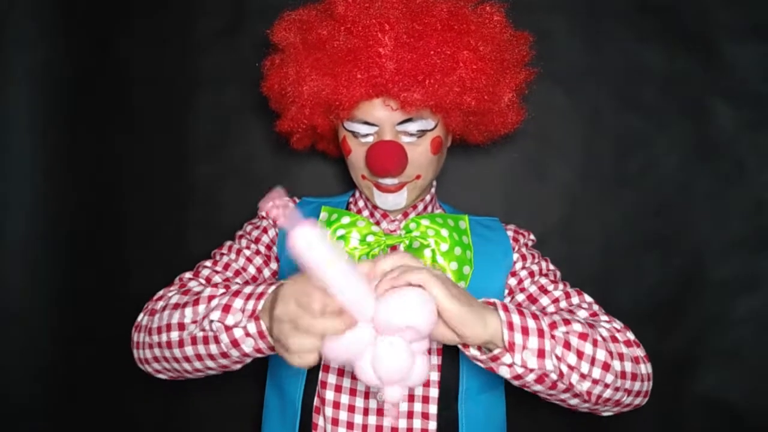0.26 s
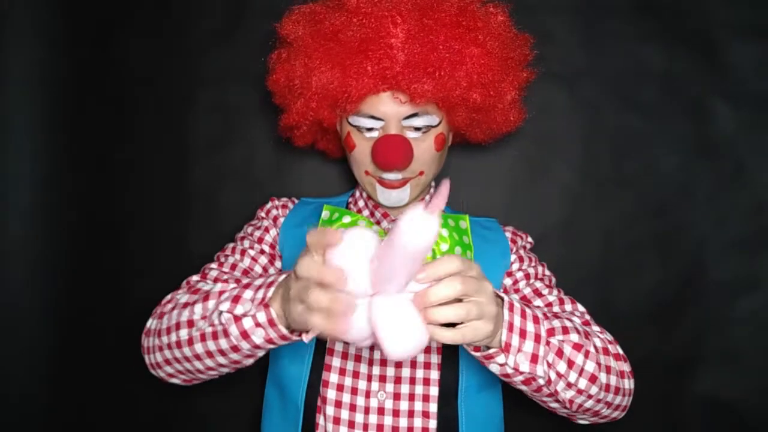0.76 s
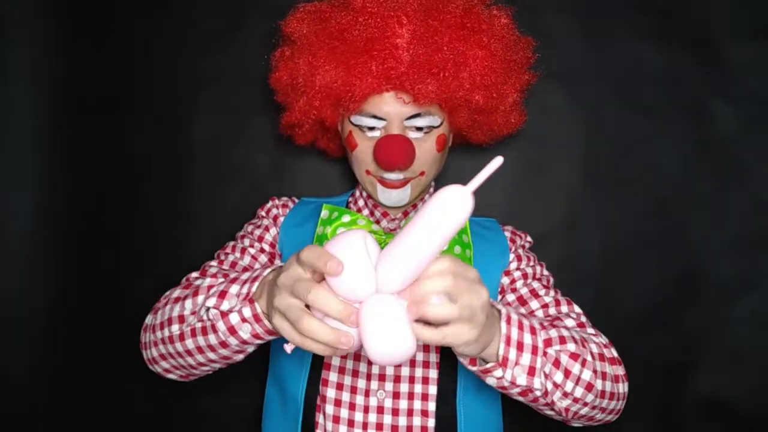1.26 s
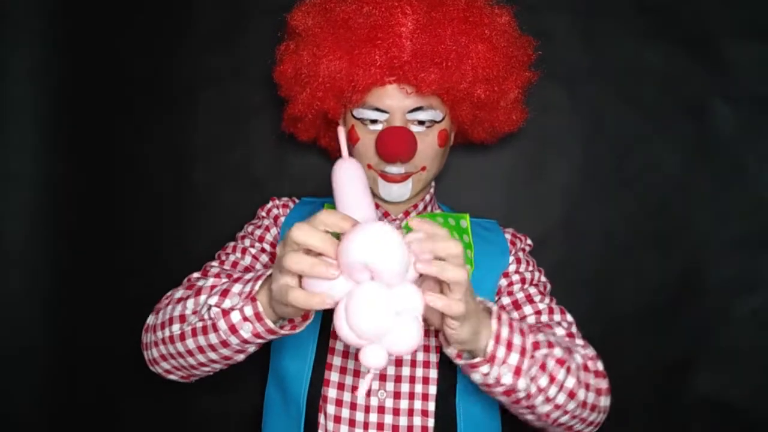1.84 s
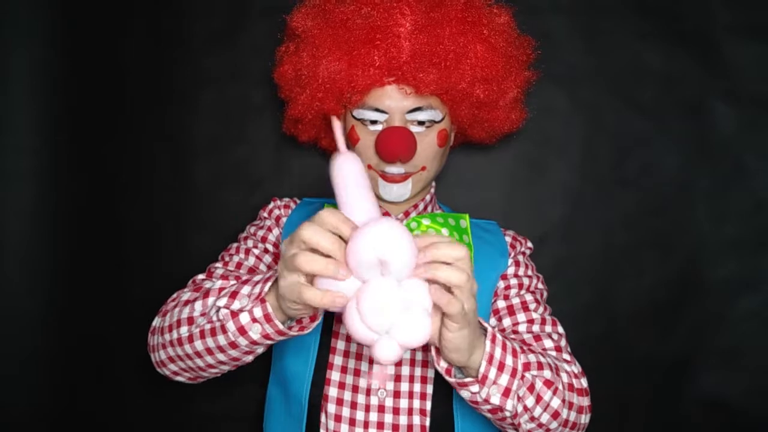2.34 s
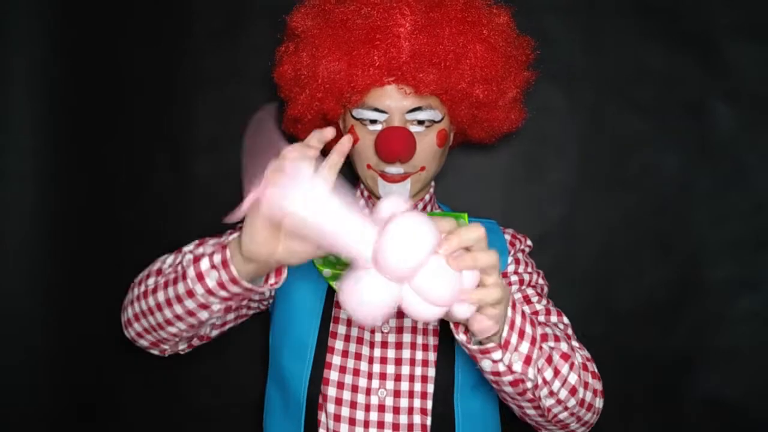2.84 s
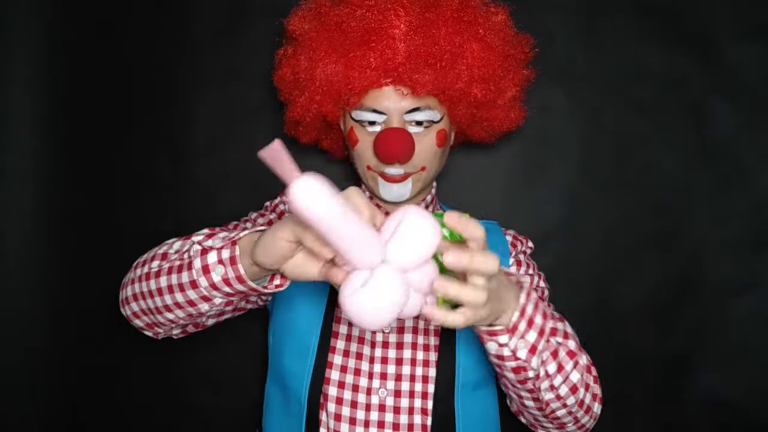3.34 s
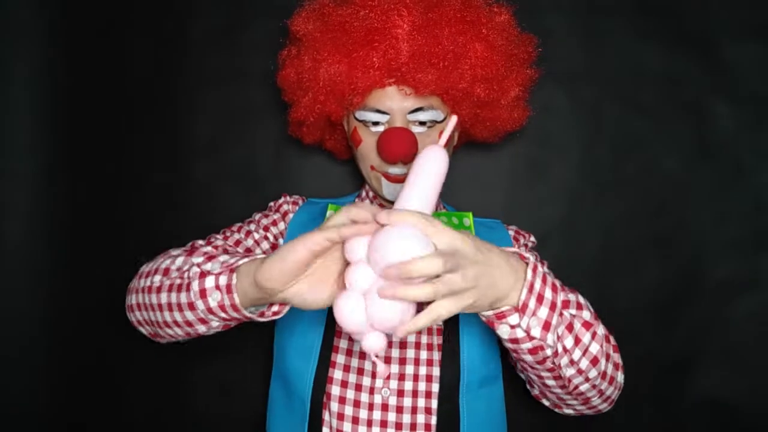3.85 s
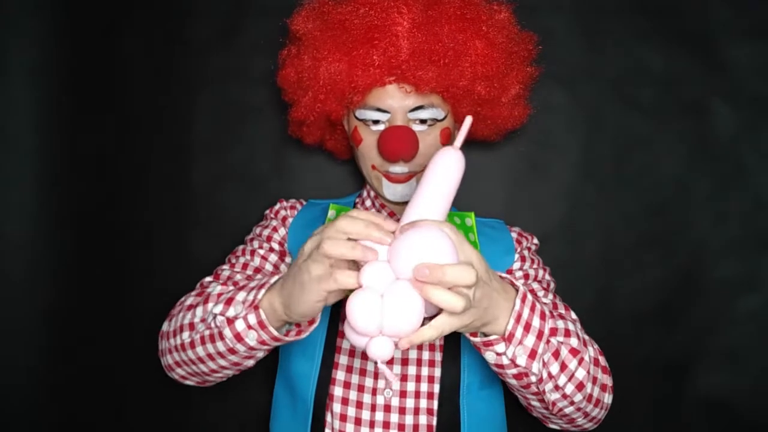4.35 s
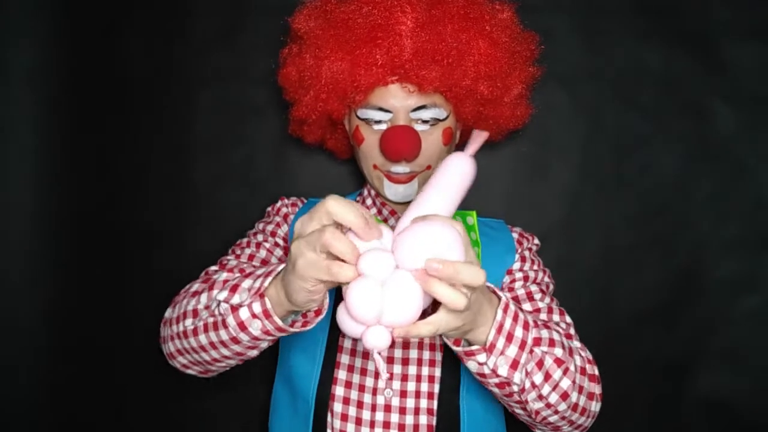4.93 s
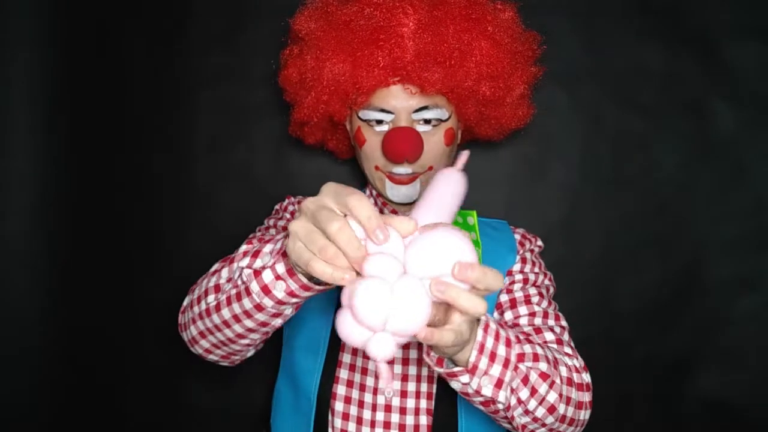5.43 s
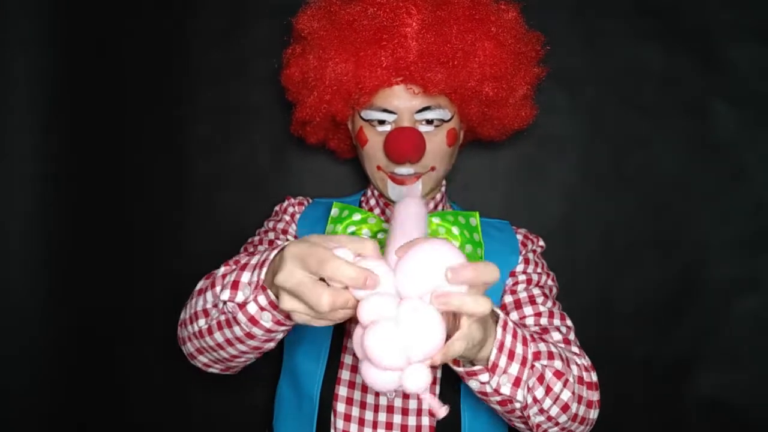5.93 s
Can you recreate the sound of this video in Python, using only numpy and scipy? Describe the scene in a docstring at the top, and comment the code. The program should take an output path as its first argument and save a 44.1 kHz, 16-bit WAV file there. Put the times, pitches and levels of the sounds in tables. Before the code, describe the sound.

Hands twist and squeeze a long latex balloon close to the microphone, in a small room with a faint steady hush. A loud cluster of rubbery creaks and sharp snaps opens the first 0.3 seconds, mixed with the hiss of sliding fingers. Softer rubbing and light knocks follow, then short creaks and snaps return from about 1 to 1.6 seconds and again at 2. After quieter rubbing, a few hollow thumps on the balloon stand out around 3 seconds, the air inside ringing briefly. Short creaks and crackling slides continue in irregular runs. From about 4.3 seconds the twisting gets busier, with quick high creaks and two hard snaps near 5.35. The loudest creak and snap come at 6 seconds, briefly overloading the microphone, and trail off in a short rub.

```python
"""A small room, close up: hands twist and squeeze a long latex balloon over a faint, steady hush.
Latex sticks on latex and lets go in sharp snaps that run together into creaks. Sliding fingers hiss
and crackle, knocks thump the balloon's bubbles, and the air inside rings on after each push.
The hardest snaps overload the microphone input."""
import sys
import numpy as np
from scipy import signal
from scipy.fft import rfft, irfft
from scipy.io import wavfile
from scipy.ndimage import uniform_filter1d

SR = 44100
rng = np.random.default_rng(int(sys.argv[2]) if len(sys.argv) > 2 else 0)


def store_wav(level_fs):
    """Save 16-bit WAV to argv[1]."""
    pcm = np.round(np.clip(np.atleast_2d(level_fs), -1, 1) * 32767)
    wavfile.write(sys.argv[1], SR, pcm.T.astype(np.int16))


N = 272957

# ringing modes of the air in the bubbles: (pitch [Hz], decay to -60 dB [s], level [dB])
AIR_MODES = [(142, 0.11, -5), (520, 0.28, -10), (757, 0.025, -5)]
# tone of a finger hissing along the latex: (frequency [Hz], level [dB])
HISS_EQ = [(150, -22.5), (1500, -27.5), (4800, -6), (5200, 6.5), (6800, 2), (8500, -11), (10500, -28.5),
           (16000, -45.5)]
# tone of a grip breaking up into crackle: (frequency [Hz], level [dB])
CRACKLE_EQ = [(60, -20.5), (500, -8), (1500, 2.5), (3500, 7), (6000, 2.5), (8500, -21), (11000, -38),
              (16000, -38.5)]
# tone of a push on a bubble: (frequency [Hz], level [dB])
PUSH_EQ = [(300, 2), (850, -4), (2000, -4.5), (5000, -17.5), (10000, -46.5)]
# tone of the taut skin when flicked: (frequency [Hz], level [dB])
SKIN_EQ = [(200, -53), (1000, -23.5), (2000, -3), (3000, 0.5), (5500, 3.5), (7000, -4), (8500, -14),
           (10500, -34.5), (16000, -54.5)]
# a finger slides along the latex: (start [s], length [s], hiss level [dB], crackle against hiss [dB])
FINGER_SLIDES = [(0.018, 0.23, -29, 0), (0.137, 0.26, -26.5, -12), (0.475, .32, -43, -7.5),
                 (0.88, 0.14, -50, -4), (0.98, 0.16, -39, -5), (1.217, 0.28, -41.5, -24),
                 (1.523, 0.049, -35.5, -5), (1.782, 0.056, -35.5, -9), (1.912, 0.3, -41.5, 0),
                 (2.251, 0.039, -42.5, 4.5), (2.4, 0.23, -35.5, -10), (2.644, 0.089, -33, -4),
                 (2.737, 0.24, -34, -13), (3.066, 0.28, -33, -7), (3.343, 0.11, -42, -25),
                 (3.59, 0.19, -34.5, -14), (3.71, 0.27, -38, -9.5), (3.91, .17, -33.5, -5.5),
                 (4.118, .1, -51, 4.5), (4.233, 0.28, -35.5, 3.5), (4.57, 0.27, -53, 11.5),
                 (4.7, 0.3, -37, 0), (5.109, 0.37, -34, 0), (5.478, 0.29, -33, -3), (5.785, 0.1, -40.5, -9),
                 (5.91, 0.098, -30, -4), (6.0, 0.27, -33.5, -10)]
# fingers knock on or brush a bubble: (time [s], level [dB], pitch [Hz])
FINGER_KNOCKS = [(0.399, -46.5, 328), (0.467, -37, 327), (0.576, -41.5, 226), (0.63, -35.5, 396),
                 (0.686, -35, 245), (0.895, -41, 270), (0.941, -27, 204), (1.715, -24.5, 315),
                 (1.734, -25.5, 303), (2.012, -23, 268), (2.58, -39, 243), (2.755, -40.5, 129),
                 (2.82, -42, 169), (2.919, -12.5, 295), (2.934, -12, 302), (2.949, -20.5, 212),
                 (3.072, -24, 282), (3.083, -17.5, 232), (3.371, -43, 304), (3.425, -42, 198),
                 (3.618, -35.5, 225), (3.834, -49, 166), (5.538, -34, 420), (5.7, -33.5, 452)]
# a twist creaks in a run of slips, and the grip tunes the stretched latex:
# (start [s], slips [count], slip rate [1/s], level [dB], skin pitch [Hz], boost at that pitch [dB],
#  bubble pitch [Hz], push on the bubble against the skin's flick [dB])
TWIST_CREAKS = [(0.0075, 4, 53, -17, 4440, 8, 395, -17.5), (0.0808, 3, 62, -14, 3720, 9, 1660, -15.5),
                (0.1496, 6, 123, -12, 2840, 2.5, 516, -9.5), (0.2606, 2, 60, -14.5, 4800, 4.5, 463, -12.5),
                (0.5696, 6, 65.5, -31, 4500, -8, 360, -15), (0.9898, 6, 56, -19, 5500, 0, 390, -15),
                (1.2146, 3, 76, -16.5, 3700, 6, 470, -15.5), (1.2925, 2, 60, -18.5, 3700, -3.5, 467, -12),
                (1.4453, 2, 77, -28, 3760, 13, 655, -26), (1.5865, 1, 86, -13, 6540, 11, 686, -16),
                (1.7829, 2, 157, -26.5, 2600, 10, 700, -8), (1.969, 2, 54.4, -12.5, 4850, 8, 903, -6.5),
                (2.272, 2, 49, -24, 2900, 5, 387, -22.5), (2.4087, 5, 41.4, -27.5, 3050, 2, 387, -27),
                (2.774, 4, 67, -26, 4970, -3, 370, -14.5), (2.9181, 2, 61, -20, 6950, -8, 260, -11.5),
                (3.1721, 3, 55, -19, 4480, 10.5, 2090, -24), (3.234, 3, 66, -28, 6040, 8, 1710, -20),
                (3.319, 2, 90, -25.5, 6350, 5, 1560, -10.5), (3.5783, 2, 71, -22.5, 2890, -2, 342, -22),
                (3.6618, 2, 68, -22, 2970, 7.5, 342, -21.5), (3.7359, 3, 78, -17, 3800, 6, 644, -14.5),
                (3.908, 2, 57, -34.5, 2970, 2, 1390, -5.5), (4.013, 2, 88, -30, 6000, 9, 1500, -4.5),
                (4.089, 1, 60, -32, 2700, 0, 520, 1.5), (4.2825, 7, 39, -16, 3850, 7, 402, -5),
                (4.7051, 3, 168, -13, 6060, 2.5, 1290, -13.5), (4.8119, 7, 143, -20.5, 4000, 2, 634, -12),
                (4.9091, 5, 49, -22, 6030, 13.5, 473, -20.5), (5.0429, 2, 88, -12.5, 6500, 2.5, 478, -12),
                (5.1262, 2, 64, -14, 5470, 3.5, 819, 0.5), (5.2262, 4, 102, -18, 5470, -0.5, 596, -4),
                (5.3098, 2, 80, -11, 4130, 6, 475, -16.5), (5.4884, 3, 34.7, -18.5, 3730, 3, 392, -16),
                (5.595, 2, 56, -16.5, 7160, 6.5, 1533, -6.5), (5.7871, 1, 60, -20.5, 5800, 15, 522, -10),
                (5.8961, 3, 77, -19, 6700, 9.5, 2160, -31), (5.9992, 4, 218, -7, 3650, 5, 568, -15.5)]
# the latex tears free in one hard snap: (time [s], level [dB])
HARD_SNAPS = [(0.0328, -12.5), (0.2008, 0), (0.208, -5.5), (0.2126, -4), (0.2169, -7), (0.2743, -11.5),
              (1.22, -13), (1.2569, -7.5), (1.3475, -12), (1.351, -7), (1.9254, -27), (2.0174, -16.5),
              (2.6667, -28), (3.002, -34), (3.2886, -18), (3.448, -37), (3.7083, -17.5), (4.3426, -19),
              (4.3771, -21), (4.4642, -28.5), (4.7051, -11.5), (4.8179, -12.5), (5.0308, -21.5),
              (5.2262, -16.5), (5.3366, -5), (5.361, -1), (5.9717, -3.5), (6.007, 8), (6.1002, -16.5)]

LEAD_S = 0.004  # run-up of each snap before the latex lets go


def undb(db):
    """Decibels to gain."""
    return 10 ** (np.asarray(db) / 20)


def unit(x):
    """Scale to rms 1."""
    return x / np.sqrt(np.mean(x ** 2))


def add(out, s, x):
    """Mix x into out from time s on."""
    i = int(np.clip(s * SR, 0, N - 1))
    out[i:i + len(x)] += x[:N - i]


def response(eq, hz=4000, boost_db=0, cut_db=0, width_oct=1, size=512):
    """Impulse response of an EQ curve, with a bell at hz and a cut of cut_db an octave below; energy 1."""
    log_hz = np.log2(np.maximum(np.arange(size // 2 + 1) * SR / size, 20))
    eq_hz, eq_db = np.transpose(eq)
    octaves = log_hz - np.log2(hz)
    db = np.interp(log_hz, np.log2(eq_hz), eq_db)
    db += boost_db * np.exp(-(octaves / width_oct) ** 2)
    db += cut_db * np.clip(octaves, -2.5, 0)
    # minimum phase keeps the attack sharp
    cepstrum = irfft(np.log(undb(db)))
    cepstrum[1:size // 2] *= 2
    cepstrum[size // 2 + 1:] = 0
    impulse = irfft(np.exp(rfft(cepstrum)))
    return impulse / np.linalg.norm(impulse)


def through(x, impulse):
    """Pass x through an impulse response."""
    return signal.fftconvolve(x, impulse)[:len(x)]


def drift(rate_hz):
    """Smooth random modulation with rms 1."""
    hold = max(int(SR / rate_hz), 2)
    steps = np.repeat(rng.standard_normal(N // hold + 1), hold)
    return unit(uniform_filter1d(steps, hold)[:N])


def room_tone():
    """A steady bed of dark noise."""
    return through(rng.standard_normal(N), response([(60, -3.5), (400, -3.5), (16000, -23.0)]))


def room_reverb(x, wet_db=-11, t60=0.26, predelay_s=0.006):
    """A short tail from the walls."""
    t = np.arange(SR // 2) / SR
    fade_in = np.clip((t - predelay_s) / 0.0023, 0, 1)
    tail = rng.standard_normal(len(t)) * fade_in * undb(-60 * t / t60)
    return through(x, undb(wet_db) * tail / np.linalg.norm(tail))


def air_ring(x, ring_db=-47):
    """The enclosed air rings on after every push."""
    t = np.arange(SR // 2) / SR
    ring = sum(undb(db - 60 * t / t60) * np.sin(2 * np.pi * hz * t) for hz, t60, db in AIR_MODES)
    return through(x, undb(ring_db) * ring)


def micro_slips(per_s, uneven_db):
    """Tiny releases at random moments, a few much louder than the rest."""
    size = undb(uneven_db * np.minimum(rng.exponential(size=N), 3))
    return unit((rng.random(N) < per_s / SR) * size * rng.choice([-1, 1], N))


def stutter(per_s, uneven_db):
    """Small stick-slip ticks that follow each other at a drifting rate."""
    count = np.floor(np.cumsum(per_s * np.exp(0.5 * drift(25))) / SR)
    size = undb(uneven_db * np.clip(rng.standard_normal(N), -2, 2))
    return unit(np.diff(count, prepend=0) * size)


def bubble_echo(x, lap_s=0.001138, echo_gain=0.5):
    """Sound comes back across the bubble; the delay drifts as the hands squeeze it."""
    lag = lap_s * SR * np.exp(0.21 * drift(4))
    return unit(x + echo_gain * np.interp(np.arange(N) - lag, np.arange(N), x))


def friction_envelopes(releases, attack_s=0.016, sag_db_per_s=27, lift_s=0.025,
                       spray_db=-19.5, spray_rise_s=0.007, spray_fall_s=0.02):
    """Hiss and crackle levels: a slide takes hold, eases off, and fades when the finger lifts."""
    hiss, crackle = np.zeros(N), np.zeros(N)
    t = np.arange(SR * 3 // 4) / SR
    for s, length, db, crackle_db in FINGER_SLIDES:
        shape = np.minimum(t / attack_s, 1) * np.exp(-np.maximum(t - length, 0) / lift_s)
        power = (shape * undb(db - sag_db_per_s * t)) ** 2
        add(hiss, s, power)
        add(crackle, s, power * undb(crackle_db) ** 2)
    # a spray of crackle swells just before each release and dies away after it
    early_s = 10 * LEAD_S
    spray = np.exp(-2 * np.abs(t - early_s) / np.where(t < early_s, spray_rise_s, spray_fall_s))
    for s, db, _ in releases:
        add(crackle, s - early_s, spray * undb(db + spray_db) ** 2)
    return np.sqrt(hiss), np.sqrt(crackle)


def rubbing(releases):
    """Sliding hisses above the tube's first cross mode near 5 kHz; gripping breaks up into crackle."""
    slide, grip = friction_envelopes(releases)
    pressure = undb(5.0 * drift(45))
    hiss = through(micro_slips(per_s=11000, uneven_db=7.5), response(HISS_EQ))
    ticks = stutter(per_s=90, uneven_db=5)
    grains = micro_slips(per_s=4000, uneven_db=5)
    crackle = undb(-2.5) * ticks + undb(-3.0) * grains
    crackle = bubble_echo(through(crackle, response(CRACKLE_EQ)))
    # the finger pads drag on the bubbles in soft, low scuffs
    scuffs = through(rng.standard_normal(N), response([(70, -11.5), (330, 1.5), (1400, -20.5)]))
    scuffs *= undb(8.3 * drift(20))
    return pressure * ((hiss + undb(-27.5) * scuffs) * slide + crackle * grip)


def thump(hz, cycles, t):
    """A bubble's damped swing, rounded by the soft fingertip; peak 1."""
    swing = np.cos(2 * np.pi * hz * t) * np.exp(-t * hz / cycles)
    rounded = through(swing, np.exp(-t * 2 * np.pi * hz))
    return rounded / np.abs(rounded).max()


def knocks(blow_cycles=0.34, tap_db=-13, brush_cycles=0.8, drag_s=0.007, brush_db=-29):
    """A blow thumps a bubble; a touch below brush_db mostly brushes across it and damps it less."""
    out, t = np.zeros(N), np.arange(SR // 10) / SR
    for s, db, hz in FINGER_KNOCKS:
        grain, grit = rng.standard_normal((2, len(t)))
        tap = through(grit, response(PUSH_EQ)) * np.exp(-t / 0.0073)
        blow = thump(hz, blow_cycles, t) + undb(tap_db) * tap
        drag = grain * np.exp(-((t - 2 * drag_s) / drag_s) ** 2 / 2)
        brush = through(drag / np.linalg.norm(drag), thump(hz, brush_cycles, t))
        softness = np.clip(0.5 + (brush_db - db) / 10, 0, 1)
        add(out, s, undb(db + 2.5) * np.sqrt(1 - softness) * blow)
        add(out, s - 2 * drag_s, undb(db + 4.5) * np.sqrt(softness) * brush)
    return out


def bubble_ring(hz, ring_db=-9, t60=0.068):
    """The squeezed bubble rings briefly at its own pitch."""
    t = np.arange(SR // 5) / SR
    return undb(ring_db - 60 * t / t60) * np.sin(2 * np.pi * hz * t)


def stick_slip_cues(gap_scatter=0.043, scatter_db=1.15):
    """Each twist's nearly even slips, then the hard snaps: (time [s], level [dB], twist [index])."""
    releases = []
    starts, counts, rates, levels = np.array(TWIST_CREAKS)[:, :4].T
    for twist, (start, count, rate, db) in enumerate(zip(starts, counts, rates, levels)):
        gap_jitter, level_jitter = rng.standard_normal((2, 16))
        gaps = (1 + gap_scatter * gap_jitter) / rate
        for i in range(int(count)):
            releases.append((start + gaps[:i].sum(), db + scatter_db * level_jitter[i], twist))
    # a hard snap takes its tuning from the nearest twist
    middles = starts + counts / rates / 2
    return releases + [(s, db, np.argmin(np.abs(middles - s))) for s, db in HARD_SNAPS]


def slip(tone, noise, creep_s, ring_s, ragged, echo_db, echo_s=0.0048):
    """The contact creeps and lets go; the wave bounces round the skin, then off hands and chest."""
    t = np.arange(len(noise)) / SR - LEAD_S
    cluster = noise * np.exp(-np.abs(t) / np.where(t < 0, creep_s, ring_s))
    force = ragged * cluster / np.linalg.norm(cluster)
    force[int(LEAD_S * SR)] += 1  # the clean click of letting go
    direct = through(force, tone)
    echoes = through(noise * (t > LEAD_S) * np.exp(-t / echo_s), tone)
    snap = direct / np.linalg.norm(direct) + undb(echo_db) * echoes / np.linalg.norm(echoes)
    return snap * np.sqrt(LEAD_S * SR)  # about rms 1 over a 4 ms snap


def creaks_and_snaps(releases, alike=0.46):
    """Each release flicks the taut skin for a few cycles and shoves the bubble behind it."""
    out = np.zeros(N)
    for twist, (*_, skin_hz, boost_db, bubble_hz, push_db) in enumerate(TWIST_CREAKS):
        shared, *paths = rng.standard_normal((16, 2, SR // 20))
        skin = response(SKIN_EQ, skin_hz, boost_db, width_oct=0.23)
        bubble = response(PUSH_EQ, bubble_hz, boost_db=7.5, cut_db=14.5, width_oct=0.1)
        # a sharply tuned patch gives one clean flick, a slack one a ragged cluster
        ragged = 1.51 * undb(-0.55 * boost_db)
        cues = [(s, db) for s, db, owner in releases if owner == twist]
        for (s, db), own in zip(cues, paths):
            # within one twist the waves take similar paths, so its snaps share a hollow colour
            skin_noise, push_noise = np.sqrt(alike) * shared + np.sqrt(1 - alike) * own
            flick = slip(skin, skin_noise, creep_s=0.0006, ring_s=0.0014, ragged=ragged, echo_db=-15.5)
            shove = slip(bubble, push_noise, creep_s=0.00035, ring_s=0.0039, ragged=0.92, echo_db=-14.5)
            add(out, s - LEAD_S, undb(db) * (flick + undb(push_db) * shove))
            add(out, s, undb(db + push_db) * bubble_ring(bubble_hz))
    return out


def scene():
    """The balloon up front in mono, with a short reverb and faint room tone behind it."""
    releases = stick_slip_cues()
    balloon = creaks_and_snaps(releases) + knocks() + rubbing(releases)
    balloon += air_ring(balloon)
    return (undb(-60.5) * room_tone() + room_reverb(balloon) + balloon)[None]


def record(dry, low_cut_hz=85, bend=0.017, high_cut_hz=15800):
    """The microphone thins the deep bass; the input clips on the hardest snaps; the top is cut."""
    thinned = signal.sosfilt(signal.butter(2, low_cut_hz, "high", fs=SR, output="sos"), dry)
    # lopsided distortion puts a low thud under each overload
    bent = thinned + bend * np.minimum(thinned ** 2, 10)
    clipped = np.clip(bent, -1, 1)
    return signal.sosfilt(signal.ellip(8, 0.2, 70, high_cut_hz, fs=SR, output="sos"), clipped)


dry = scene()
out = record(dry)
store_wav(out)
```